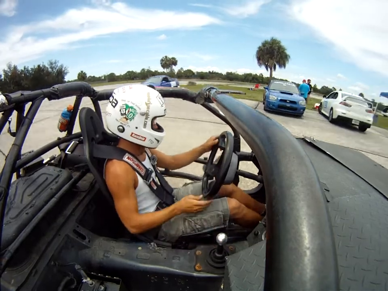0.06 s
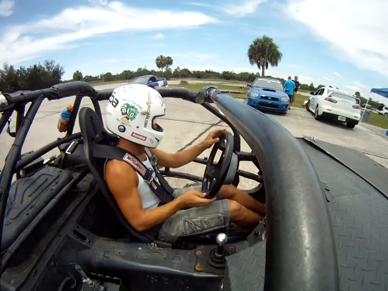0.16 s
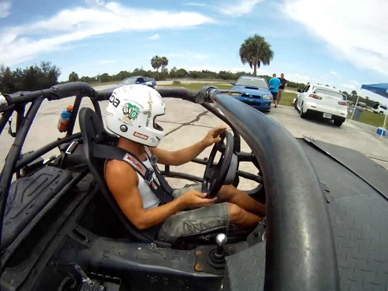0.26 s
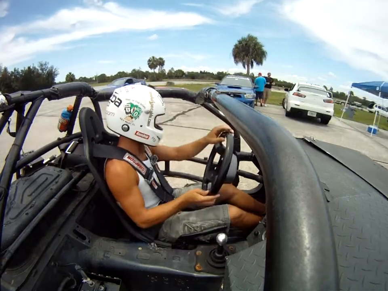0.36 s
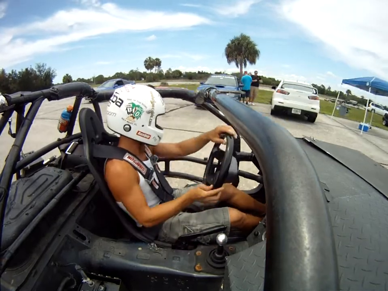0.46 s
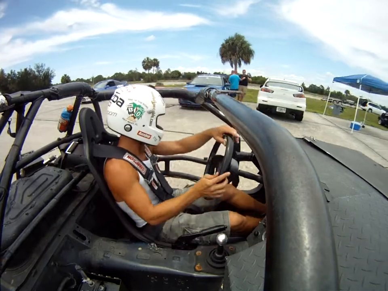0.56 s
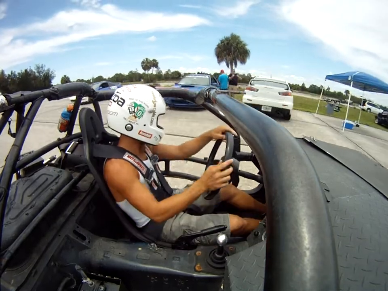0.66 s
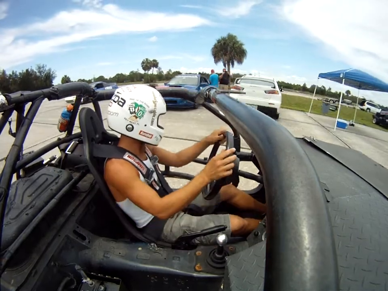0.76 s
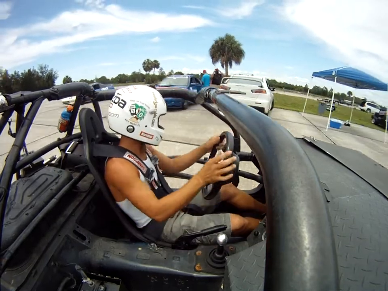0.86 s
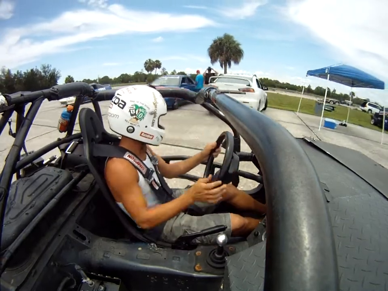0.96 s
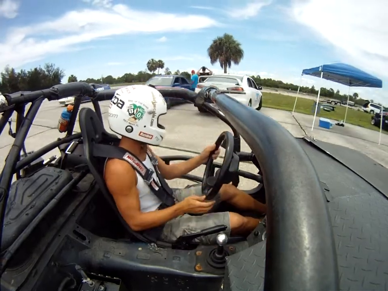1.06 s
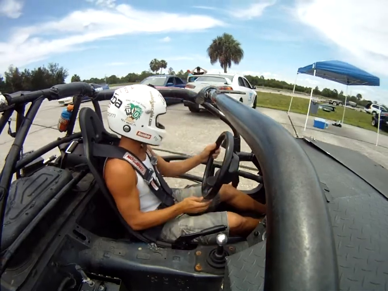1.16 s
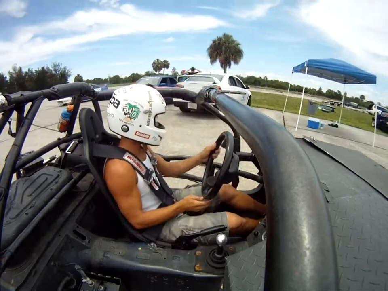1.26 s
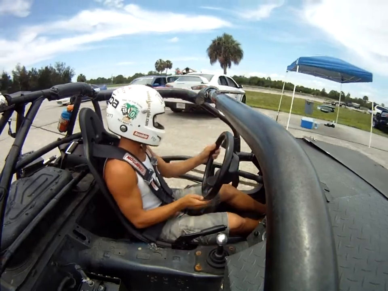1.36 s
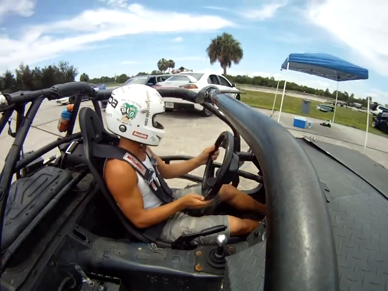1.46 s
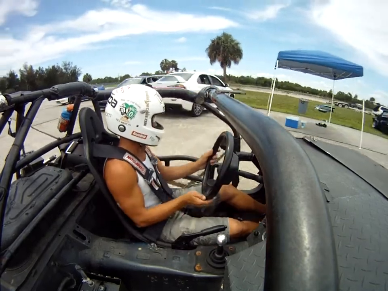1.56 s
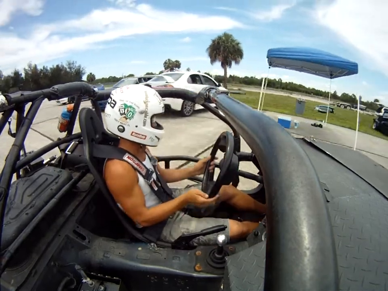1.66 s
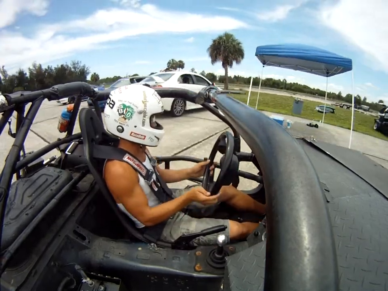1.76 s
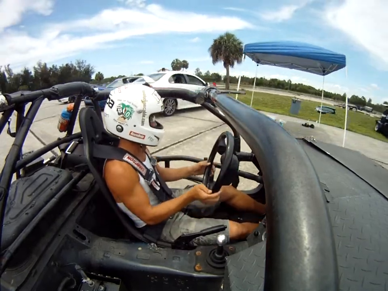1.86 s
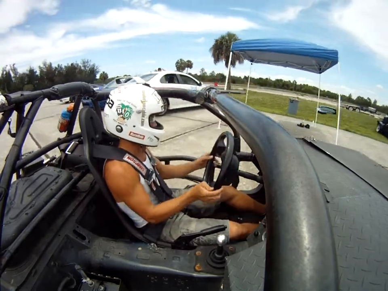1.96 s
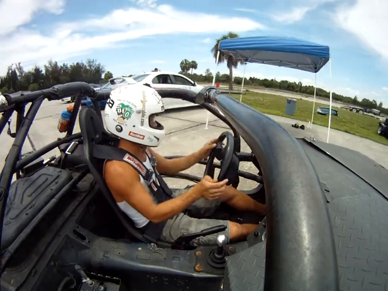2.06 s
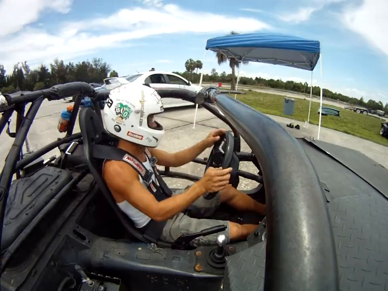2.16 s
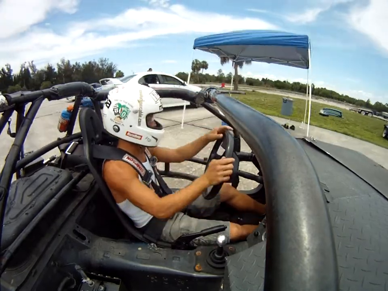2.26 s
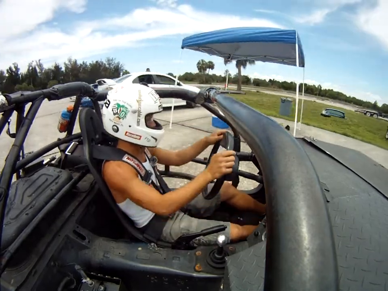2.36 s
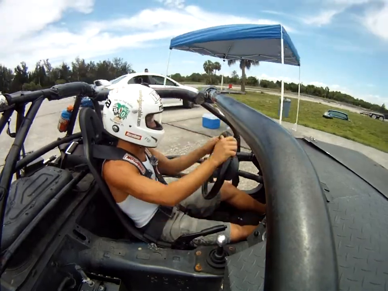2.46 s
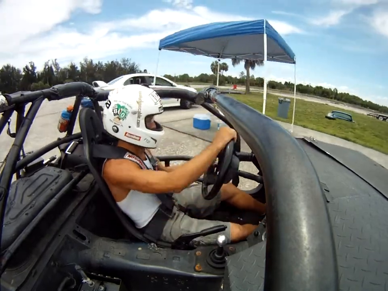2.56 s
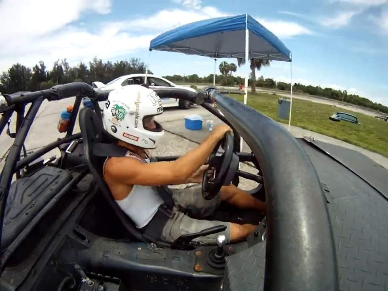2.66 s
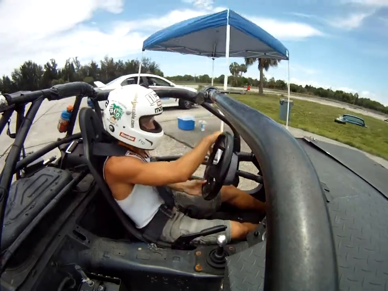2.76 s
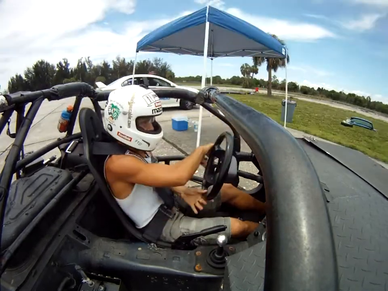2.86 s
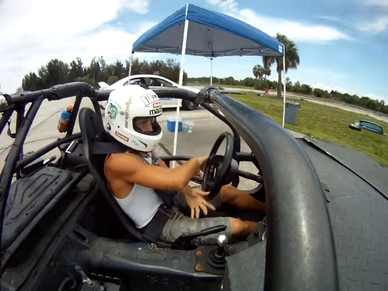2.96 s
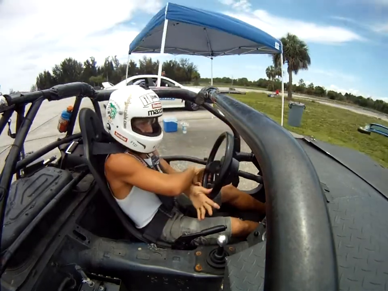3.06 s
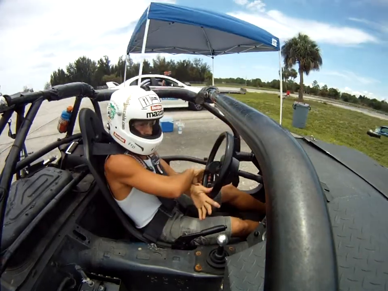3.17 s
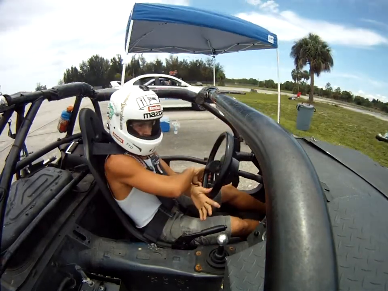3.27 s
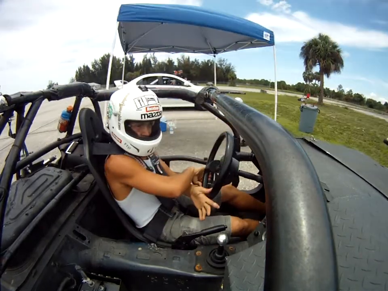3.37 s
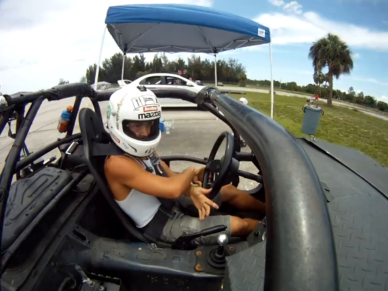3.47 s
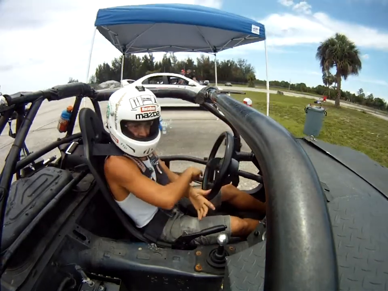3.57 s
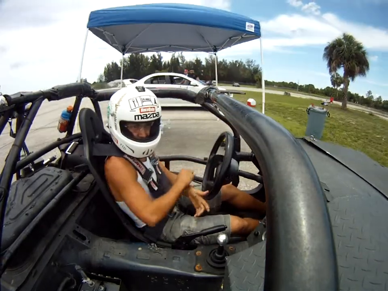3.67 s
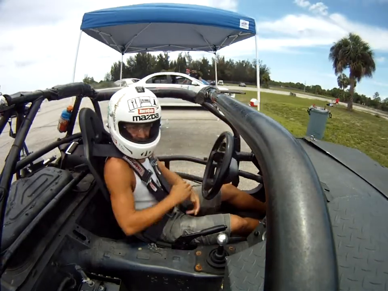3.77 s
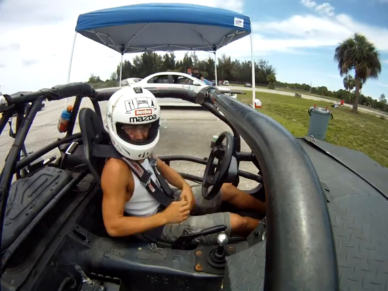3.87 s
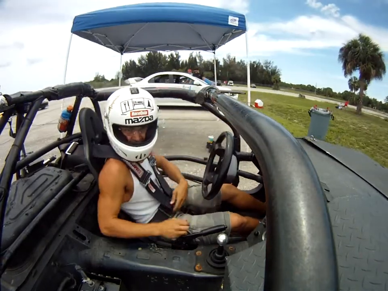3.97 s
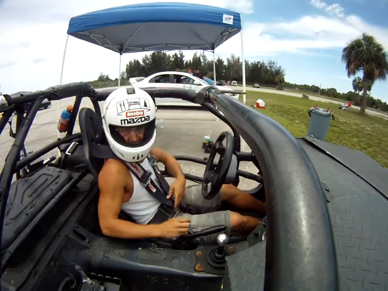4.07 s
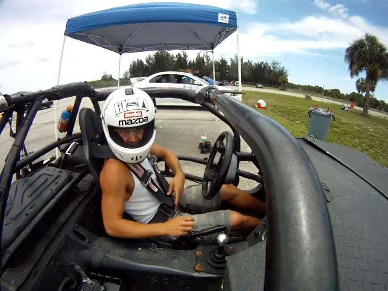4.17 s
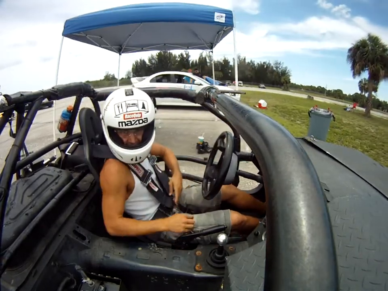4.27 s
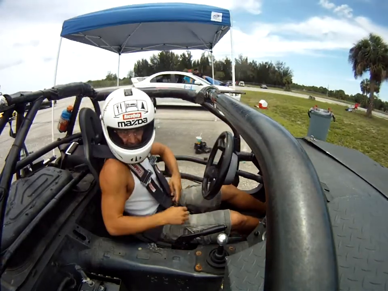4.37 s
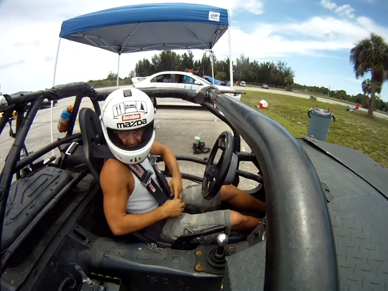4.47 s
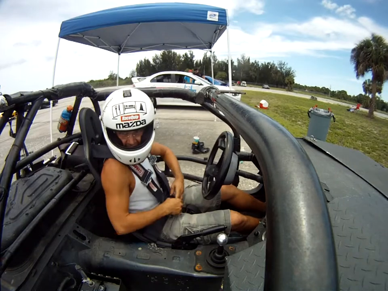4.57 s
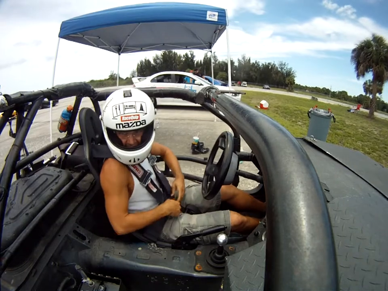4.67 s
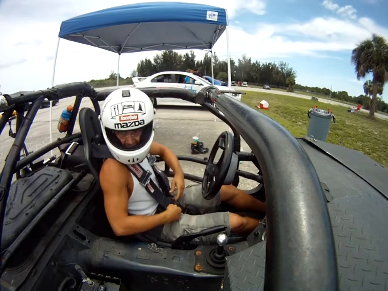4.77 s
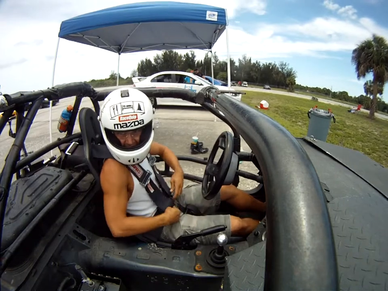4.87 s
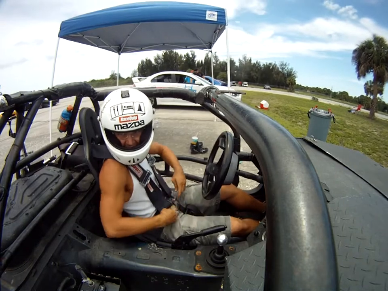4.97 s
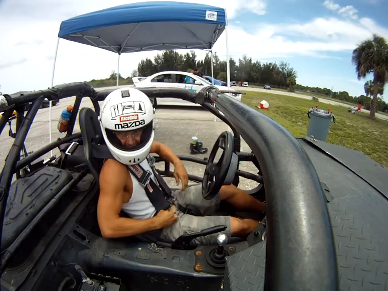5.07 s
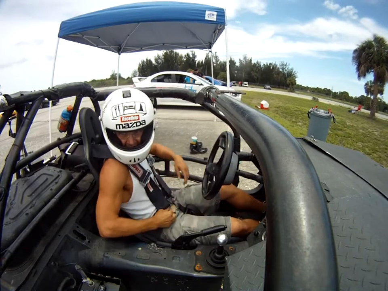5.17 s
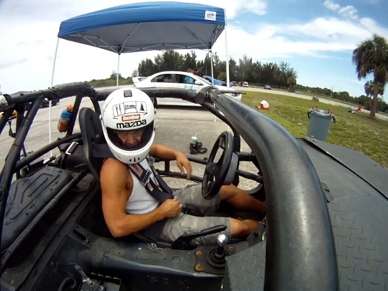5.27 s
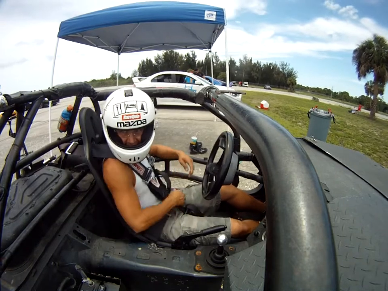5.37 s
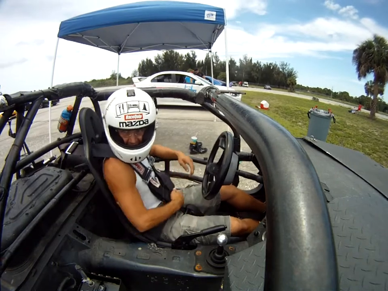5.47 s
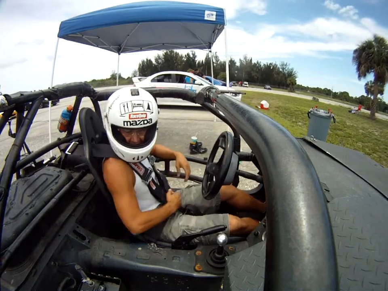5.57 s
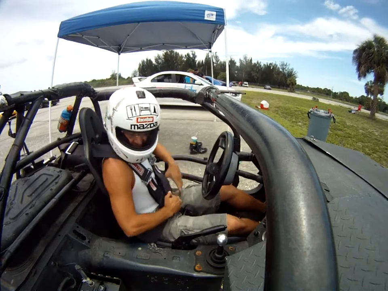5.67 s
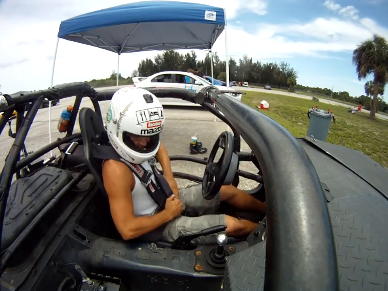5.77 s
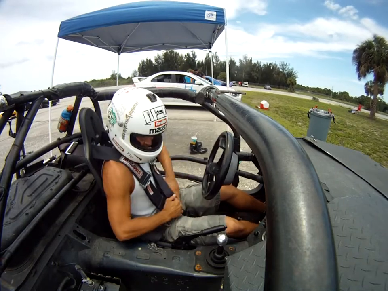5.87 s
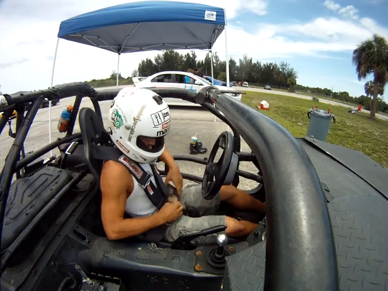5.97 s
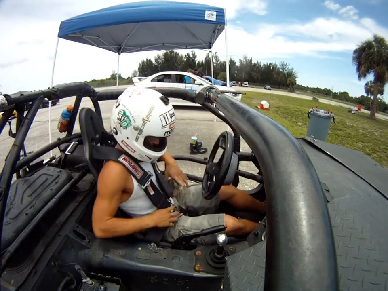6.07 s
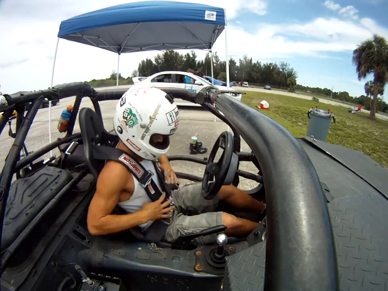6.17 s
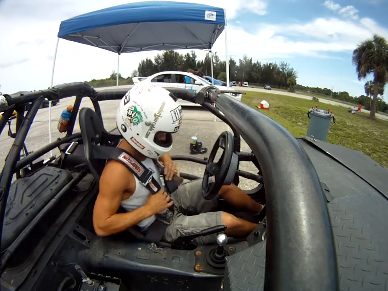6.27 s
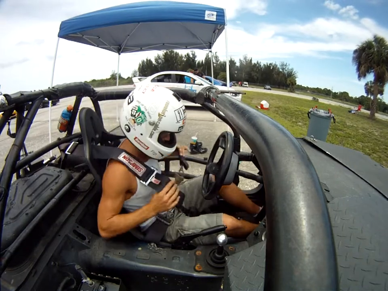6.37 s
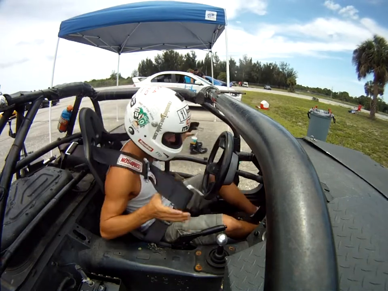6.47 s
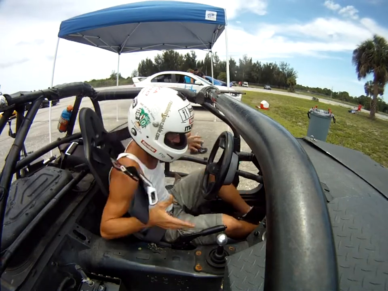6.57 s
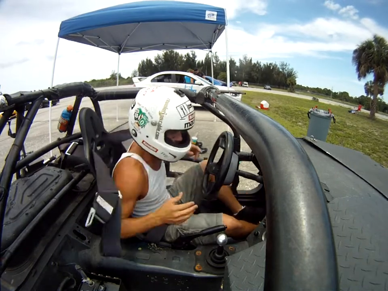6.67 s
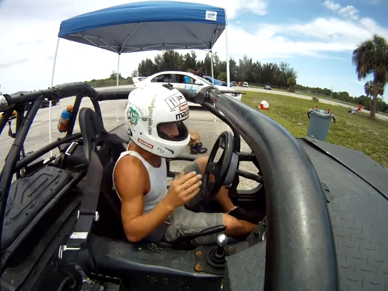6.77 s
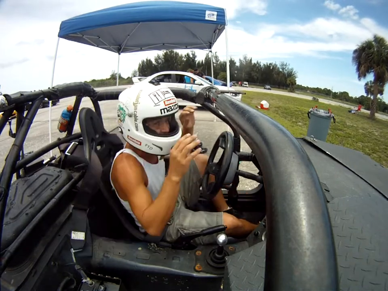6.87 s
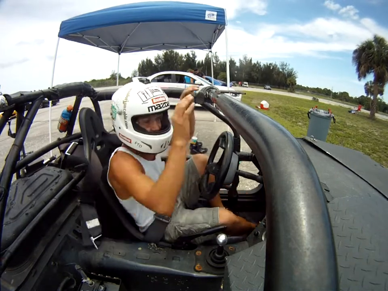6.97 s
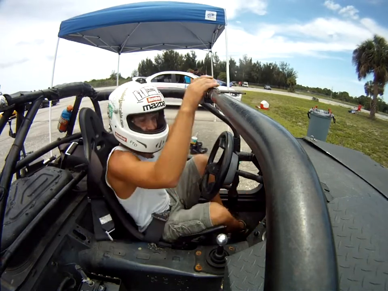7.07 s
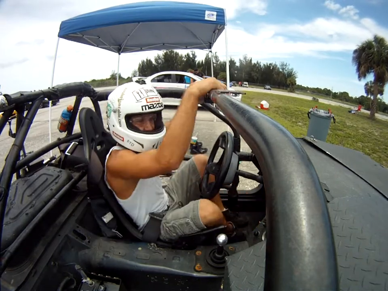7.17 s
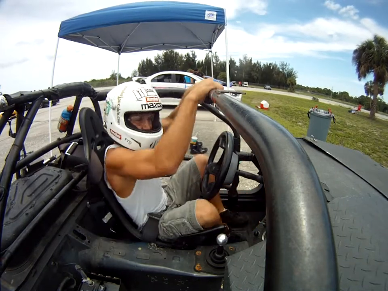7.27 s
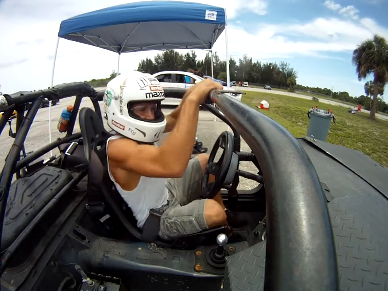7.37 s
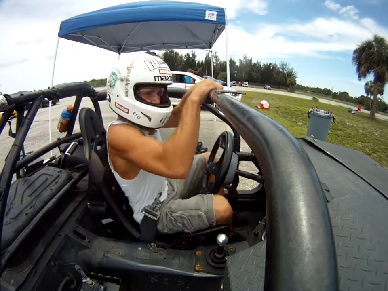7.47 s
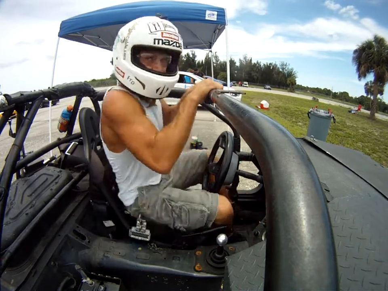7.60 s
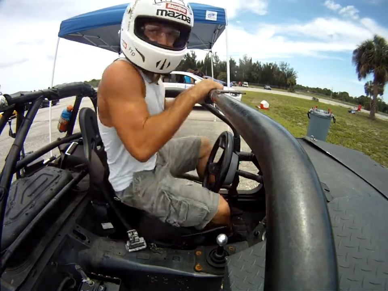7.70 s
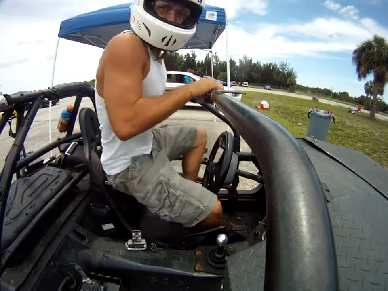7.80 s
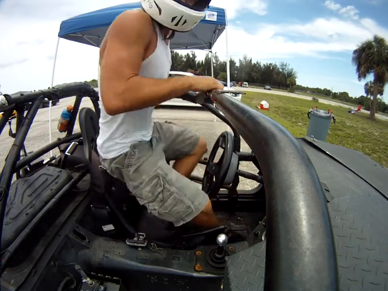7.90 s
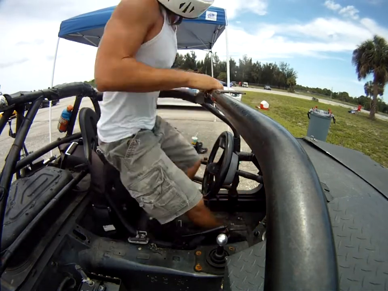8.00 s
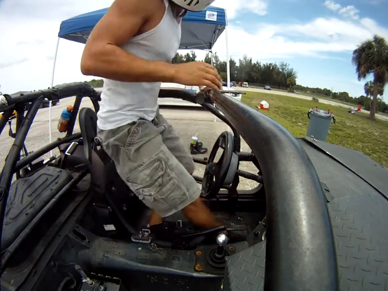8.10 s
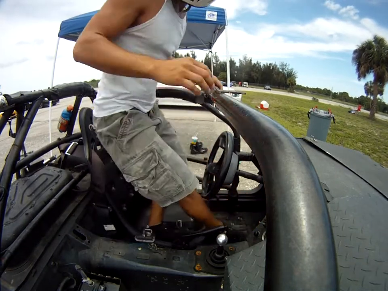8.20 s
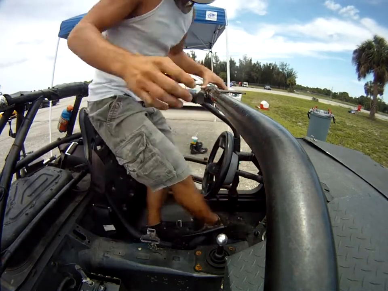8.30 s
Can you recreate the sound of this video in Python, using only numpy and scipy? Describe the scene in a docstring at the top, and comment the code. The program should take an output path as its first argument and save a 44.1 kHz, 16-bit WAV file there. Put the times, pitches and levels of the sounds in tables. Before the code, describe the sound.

A cage-mounted microphone on an open tube-frame car gives close, mid-heavy, slightly crunchy mono sound. From 0 to 2.2 s a low uneven idle throbs over deep chassis rumble, with irregular thin bright ticks and a few faint knocks. At about 2.3 s the engine is blipped, climbing fast to a peak near 2.6 s with rasp and metallic buzz, then gliding down; loose parts chatter until 3.2 s, and another rasp swells around 4.2 s. Loping, thuddy burbles from 4.4 to 4.9 s end in a stop by 5.25 s. Quiet follows, with faint tinks and a small patter of ticks near 5.3 s. At 6.2 s a buckle clacks sharply. A very loud, short smack comes at 6.86 s with a thin brief ring, then bright clanks from 7.0 to 7.4 s, and heavier knocks, thuds and scrabbling on ringing tubes from 7.63 s, thinning out by 8.3 s.

```python
"""On an open tube-frame car rolling to a stop, heard through a small recorder clamped to the roll cage.
The engine is a sum of sines at multiples of its firing rate: it idles, is blipped once and runs down,
its last burbles being thud-heavy transients.
Noise through resonances makes the shaking, rasp and chatter of the cage; thin ticks go on.
The driver then drops the harness buckles and climbs out: short blows and scrabbling noise ring the
cage tubes. A few decaying or steady sines are small metal parts."""
import sys
import numpy as np
from scipy import signal
from scipy.io import wavfile

SR = 44100
rng = np.random.default_rng(int(sys.argv[2]) if len(sys.argv) > 2 else 0)


def transcribe(signal):
    """Save signal, clipped to [-1, 1], as a 16-bit WAV file at the path in sys.argv[1]."""
    frames = np.atleast_2d(signal).T
    limited = np.clip(frames, -1, 1)
    pcm = np.round(limited * 32767).astype(np.int16)
    wavfile.write(sys.argv[1], SR, pcm)


N = 367794
RISE_S = 0.001   # onset of every short sound

# the blip and run-down of the engine: time_s, firing_hz, first_order_db, other_orders_db
RUN_DOWN = [(2.25, 77.9, -18, -29.5), (2.39, 95.86, -32, -35), (2.51, 136.1, -15, -30),
            (2.6, 158.7, -17, -36.5), (2.72, 154.6, -17, -26.5), (2.88, 147, -14.5, -53),
            (2.97, 137.7, -17.5, -40), (3.21, 125.3, -19.5, -40), (3.3, 118.9, -23, -41),
            (3.4, 112.4, -37.5, -33), (3.59, 100.9, -36.5, -34.5), (3.89, 87.1, -25, -41.5),
            (4.01, 83.7, -23, -48), (4.17, 77.53, -19.5, -40), (4.27, 75.9, -31, -36.5),
            (4.47, 65.2, -46, -39.5), (4.72, 50.8, -26.5, -50), (4.9, 43.4, -18, -45),
            (5.06, 37.5, -25, -41), (5.25, 30.8, -35, -46)]
# resonances of the cage tubes, the bright ones from the 14th on: centre_hz, width_hz, level_db
CAGE_MODES = [(702.5, 88, -3.5), (955, 79, -2.5), (1058, 62, -0.5), (1141.6, 46, 1.5), (1229, 59, -0.5),
              (1428, 54, -7), (1523, 33, 0), (1619, 117, -3.5), (1821, 124, -4.5), (1985, 64, -3.5),
              (2114, 116, -4), (2500, 340, -10), (2666, 275, -11), (3070, 190, -20), (3710, 274, -17.5),
              (4060, 210, -64), (5200, 1000, -27), (4970, 4300, -35)]


def amp(db):
    """Level to amplitude: 20 dB is a factor of ten."""
    return 10 ** (np.asarray(db) / 20)


def rms_one(x):
    """Normalisation to unit root-mean-square."""
    return x / np.sqrt(np.mean(x ** 2) + 1e-20)


def in_time(rows):
    """Linear interpolation of a curve's columns, sample by sample."""
    s, *columns = np.transpose(rows)
    return [np.interp(np.arange(N) / SR, s, column) for column in columns]


def during(rows, fade=0.04):
    """Gate that is open while a curve lasts, with linear fades (s)."""
    t = np.arange(N) / SR
    return np.clip(np.minimum(t - rows[0][0], rows[-1][0] - t) / fade, 0, 1)


def drift(rate):
    """Random fluctuation of unit rms: noise through a double-pole low-pass of the given rate (Hz)."""
    step = 40   # samples between computed points
    r = np.exp(-2 * np.pi * step * rate / SR)
    noise = rng.standard_normal(N // step + 2002)
    slow = signal.lfilter([1], [1, -2 * r, r * r], noise)[2000:]   # without the filter's start
    return np.interp(np.arange(N) / step, np.arange(len(slow)), rms_one(slow))


def resonance(x, hz, width):
    """Damped resonator: a pole pair of the given bandwidth (Hz), near unit gain at its centre."""
    r = np.exp(-np.pi * abs(width) / SR)
    zeros = np.array([1, 0, -1]) * (1 - r * r) / 2
    return signal.lfilter(zeros, [1, -2 * r * np.cos(2 * np.pi * hz / SR), r * r], x)


def body(x, modes, twice=False):
    """Modal superposition: resonances in parallel, signs alternating."""
    out = 0
    for k, (hz, width, level_db) in enumerate(modes):
        rung = resonance(x, hz, width)
        if twice:                       # steeper skirts, darker valleys
            rung = resonance(rung, hz, width * 2)
        out = out + (-1) ** k * amp(level_db) * rung
    return out


def pulses(rate, jitter, spread_db, burst_s):
    """Pulse train at a wavering rate (Hz), each pulse a decaying noise burst of its own size."""
    turns = np.cumsum(rate * (1 + jitter * drift(25))) / SR
    starts = np.diff(np.floor(turns), prepend=0) > 0
    marks = starts * amp(spread_db * rng.standard_normal(N))
    r = np.exp(-1 / (burst_s * SR))
    return signal.lfilter([1], [1, -r], marks + 1e-18) * rng.standard_normal(N)


def bursts(rows):
    """Transient noise under a Gaussian decay; rows of time_s, level_db, length_s (RISE_S is added)."""
    out, t = np.zeros(N), np.arange(SR // 20) / SR
    noise = rng.standard_normal((len(rows), len(t)))
    for (s, level_db, length), hiss in zip(rows, noise):
        envelope = np.minimum(t / RISE_S, 1) * np.exp(-(t / (abs(length) + RISE_S)) ** 2)
        i = round(s * SR)
        out[i:i + len(t)] += amp(level_db) * envelope * hiss
    return out


def engine():
    """Harmonic synthesis: orders of the firing rate, a little unsteady in level."""
    # multiples of the firing rate, and their levels in dB before the colour
    other_orders = [.5, 1.5, 2.5, 3, 3.5, 4, 5]
    other_orders_db = [0, 1, -9, -3, -11, -2.5, -8.5]
    # colour of the other orders along pitch: pitch_hz, level_db
    colour = np.array([(15, -14), (70, 3.5), (160, -6), (200, -14), (260, -13), (330, -6), (440, -3),
                       (520, -41.5), (900, 8)])
    hz, first_db, other_db = in_time(RUN_DOWN)
    phase = 2 * np.pi * np.cumsum(hz) / SR
    # below 53.4 Hz the dying engine lopes, fully from 7.4 Hz lower; it lurches at 4.81 s, period 0.124 s
    lope = np.cos(2 * np.pi * (np.arange(N) / SR - 4.81) / 0.124) - 1
    lope_db = 6 * lope * np.clip((53.4 - hz) / 7.4, 0, 1)
    out = amp(first_db + 1.15 * drift(11) + lope_db) * np.sin(phase)
    # the second order stands out only while it passes the body's boom
    boom_hz, boom_width_hz, over_first_db = 158.6, 11.7, 4.5
    second = amp(over_first_db + first_db) / (1 + ((2 * hz - boom_hz) / boom_width_hz) ** 2) ** 2
    out += second * amp(0.5 * drift(36)) * np.sin(2 * phase)
    for order, order_db in zip(other_orders, other_orders_db):
        colour_db = np.interp(np.log(order * hz), np.log(colour[:, 0]), colour[:, 1])
        level = amp(other_db + order_db + colour_db + 3.8 * drift(11))
        out += level * np.sin(order * phase + rng.uniform(0, 2 * np.pi))
    return np.sqrt(2) * during(RUN_DOWN) * out


def idle():
    """Harmonic synthesis: orders of the idling engine swell and fade as firings come unevenly."""
    # idling: time_s, firing_hz, level_db
    idling = [(0.0, 34.2, -18.5), (0.3, 31.34, -25), (0.55, 30.59, -23), (0.82, 32.88, -21.5),
              (1.2, 31.83, -25.5), (1.45, 33.63, -27), (1.7, 32.23, -23.5), (2.3, 32.73, -23.5)]
    # multiples of the firing rate, and their levels in dB
    idle_orders = [1, 1.5, 2, 3, 4, 5, 10]
    idle_orders_db = [-2.5, -6.5, -5.5, -9, -13, -8.5, -26]
    hz, level_db = in_time(idling)
    phase = 2 * np.pi * np.cumsum(hz * (1 + 0.01436 * drift(5.55))) / SR
    orders = sum(amp(order_db + 3.3 * drift(12.3)) * np.sin(order * phase + rng.uniform(0, 2 * np.pi))
                 for order, order_db in zip(idle_orders, idle_orders_db))
    fade_out = np.clip((idling[-1][0] - np.arange(N) / SR) / 0.13, 0, 1)
    return amp(level_db) * fade_out * orders


def shaking():
    """Forced vibration: uneven running and rough ground drive chassis, panels and cage as noise."""
    # shaking of the car: time_s, rumble_db, boom_db, cage_buzz_db
    shake = [(0.0, -19, -37, -39.5), (0.3, -18.5, -35.5, -43.5), (0.65, -17.5, -30, -42),
             (0.9, -24, -29.5, -46), (1.51, -25.5, -37.5, -47.5), (2.04, -25.5, -38.5, -47.5),
             (2.32, -22.5, -24, -40), (2.6, -27, -30, -31.5), (2.85, -19.5, -26, -36),
             (3.09, -25, -27, -33), (3.28, -21, -28.5, -37), (3.44, -20.5, -36.5, -38.5),
             (3.95, -29.5, -38, -44), (4.16, -31, -31, -32.5), (4.3, -22, -33, -43),
             (4.64, -39, -40, -48.5), (4.95, -36, -45.5, -50.5), (5.09, -32.5, -43.5, -51),
             (5.62, -33, -47, -52), (6.6, -33.5, -44.5, -52.5), (7.1, -34.5, -45.5, -47),
             (7.5, -35, -46, -46), (8.34, -32.5, -43, -47)]
    # resonances of chassis, boom and panels: centre_hz, width_hz, level_db
    rumble_modes = [(32.6, 24.1, 3.5), (60, 17.6, 4), (92.2, 19.7, -9.5)]
    boom_modes = [(138, 14, -2), (157.9, 11.8, 3.5)]
    panel_modes = [(230, 81, -5), (307.5, 28.4, 5.5), (372, 55, -0.5), (437, 62, -8)]
    rumble_db, boom_db, buzz_db = in_time(shake)
    # the panels lie at -55 dB at a calm buzz of -50.5 dB and follow nearly all of its swing
    panel_db = -55 + 0.99 * (buzz_db + 50.5)
    white = rng.standard_normal((4, N))
    grit = white[3] * amp(0.97 * drift(33.0) + 2.3 * drift(165))      # the buzz comes in small lumps
    rumble = amp(rumble_db) * rms_one(body(white[0], rumble_modes, twice=True))
    boom = amp(boom_db) * rms_one(body(white[1], boom_modes, twice=True))
    panels = amp(panel_db + 3.64 * drift(89)) * rms_one(body(white[2], panel_modes, twice=True))
    buzz = amp(buzz_db) * rms_one(body(grit, CAGE_MODES))
    return rumble + boom + panels + buzz


def rasp():
    """Amplitude-gated noise: contact at each firing, lumpy, rings the tubes nearest the engine."""
    # swells, rise and fall being times per 20 dB: loudest_s, level_db, rise_s, fall_s
    rasp_swells = [(2.54, -15.5, 0.051, 0.062), (2.66, -31, .1, .15), (3.0, -29, 0.17, 0.11),
                   (3.171, -16, 0.25, 0.043), (3.6, -39.5, 0.99, 0.033), (3.9, -49, 0.023, 0.56),
                   (4.05, -26.5, .15, 0.27), (4.21, -19, 0.31, 0.063), (4.46, -35.5, 0.38, .04)]
    # tubes nearest the engine: centre_hz, width_hz, level_db
    tube_modes = [(756, 40.5, 4), (993, 65, 1), (1159, 27.5, 5), (1238, 80, -3), (1420, 67, 2),
                  (1501, 30, 3), (1595, 31, 4.5), (2124, 42, -8), (3700, 230, -26.5), (4700, 460, -50.5),
                  (4830, 370, -50)]
    gated = pulses(in_time(RUN_DOWN)[0], jitter=0.03, spread_db=1.5, burst_s=0.0036)
    t = np.arange(N) / SR
    swells = sum(amp(level_db - 20 * np.maximum((s - t) / rise, (t - s) / fall))
                 for s, level_db, rise, fall in rasp_swells)
    return amp(1.18 * drift(30.5) - 9.0) * swells * rms_one(body(gated, tube_modes, twice=True))


def chatter():
    """Repeated impact, a tap every second firing: a loose part rings; runs swell and fade."""
    # runs of taps, level before the part's gain: first_s, loudest_s, end_s, level_db
    runs = [(2.546, 2.556, 2.57, -31), (2.603, 2.604, 2.61, -39), (2.7744, 2.78, 2.83, -38.5),
            (2.905, 2.904, 3, -38), (3.044, 3.05, 3.08, -35), (3.0904, 3.16, 3.21, -26)]
    # resonances of the loose part: centre_hz, width_hz, level_db
    loose_part = [(3745, 186, 1.5), (5350, 380, -1.5), (2140, 440, 3)]
    swell_db_per_s, fade_db_per_s, tap_s = 70, 243, 0.0085
    taps = []
    for first, loudest, last, level_db in runs:
        gap = 2 / np.interp(loudest, *np.transpose(RUN_DOWN)[:2])
        for s in np.arange(first, last, gap):
            below_db = max(swell_db_per_s * (loudest - s), fade_db_per_s * (s - loudest))
            taps.append((s, level_db - below_db, tap_s))
    return amp(17.0) * body(bursts(taps), loose_part, twice=True)


def knocks_and_burbles():
    """Transient excitation: a contact, then noise dying away in cage and floor, and a bright crack."""
    # knocks on the cage; the four thud-heavy rows from 4.439 to 4.899 s are burbles of the dying engine;
    # thud and crack relative to the level: time_s, level_db, thud_db, crack_db, centre_hz, t60_s
    events = [(0.028, -28, -18, -29, 1160, 0.087), (0.532, -32, -20, -29, 1150, .08),
              (0.558, -31.5, -20, -27, 1550, .07), (0.926, -31.5, -18, -32, 1390, .1),
              (1.448, -35, -20, -32, 1449, 0.12), (4.439, -42.5, 13.5, -25, 900, .12),
              (4.601, -44.5, 12, -25, 900, 0.12), (4.675, -37.5, 6.5, -25, 1155, 0.13),
              (4.899, -49.5, 14, -25, 893, 0.085), (6.166, -22, 6.5, -32, 1150, 0.089),
              (6.203, -5.5, -17.5, -18, 1370, 0.17), (6.207, -18.5, -30, -14, 2580, 0.098),
              (6.251, -17.5, -8.5, -15, 1340, .17), (6.253, -24, -30, -15, 2500, 0.18),
              (6.276, -30, -4, -15, 1196, 0.33), (6.833, -36.5, -8, -8, 2090, 0.16),
              (6.851, -12.5, -30, -21, 1690, 0.075), (6.859, 4, -35, -17, 1650, 0.019),
              (6.868, -14.5, -13, -17, 1100, 0.11), (6.883, -19, -14, -35, 1200, 0.21),
              (7.015, -9, -27, -9.5, 2050, 0.12), (7.071, -24, -24, -25, 1340, 0.14),
              (7.217, -28, -17, -13, 1160, 0.081), (7.244, -24, -21, -10, 1120, 0.057),
              (7.31, -11.5, -23, -13.5, 1350, 0.13), (7.342, -16, -19, -16, 1440, 0.084),
              (7.402, -8, -31, -25, 1700, 0.13), (7.634, -22.5, -8, -35, 1150, 0.067),
              (7.652, -11.5, 2, -19, 1180, 0.12), (7.666, -20.5, -8, -0.5, 1400, 0.1),
              (7.709, -11.5, -8.5, -11, 1490, 0.12), (7.745, -14, -2.5, -10, 1550, 0.16),
              (7.79, -21, -14, -30, 1290, 0.052), (7.941, -13.5, -10, -22, 1220, 0.072),
              (7.964, -32, 10.5, -32, 1120, 0.19), (8.048, -11, -13.5, -17.5, 1450, 0.16),
              (8.074, -21, -9, -17, 1270, 0.14), (8.159, -22, -7, -24, 1300, 0.065),
              (8.224, -27, -5, -29, 1240, 0.071), (8.27, -30.5, -14, -31, 1270, 0.2)]
    # resonances of floor and seat: centre_hz, width_hz, level_db
    floor_modes = [(131.6, 48, 5.5), (312, 67, 0.5), (381, 63, 1), (682, 110, -8.5)]
    tubes, bright = CAGE_MODES[:13], CAGE_MODES[13:]
    out, t = np.zeros(N), np.arange(SR // 3) / SR
    noise = rng.standard_normal((len(events), 4, len(t)))
    luck = rng.standard_normal((len(events), len(CAGE_MODES)))
    rise, impulse = np.minimum(t / RISE_S, 1), t == 0
    for (s, level_db, thud_db, crack_db, hiss_hz, t60), hiss, odd in zip(events, noise, luck):
        after = np.maximum(t - 0.067 * t60, 0)   # the contact lasts a share of t60
        push = rise * amp(-60 * after / (abs(t60) + RISE_S))
        touch = rise * amp(-60 * after / (0.33 * t60))
        contact = body(touch * hiss[0], [(hiss_hz, 450., 0)], twice=True)
        # excited tubes ring narrower, short events wider; modes near the centre pitch answer most
        excited = [(f, 0.39 * width + 2.47 / t60, mode_db - 8.2 * np.log2(f / hiss_hz) ** 2 + 3.5 * o)
                   for (f, width, mode_db), o in zip(tubes, odd)]
        # the scrabble is grainy: two noises multiplied
        ring = body(push * hiss[1] * hiss[0] + amp(20) * impulse, excited, twice=True)
        thud = body(push ** 0.71 * hiss[2] + amp(24) * impulse, floor_modes, twice=True)
        crack = body(push ** 1.55 * hiss[3], bright, twice=True)
        parts = ((-5.0, contact), (-1.5, ring), (thud_db, thud), (crack_db, crack))
        event = sum(amp(part_db) * part / np.abs(part).max() for part_db, part in parts)
        i = round(s * SR)
        out[i:i + len(t)] += amp(level_db) * event[:N - i]
    return out


def pings():
    """Pure tones: thin steady rings with linear fades."""
    # start_s, length_s, pitch_hz, level_db
    rings = [(6.9, 0.13, 1927, -38.5), (3.6, 0.39, 1545, -53)]
    t, fade_s = np.arange(N) / SR, 0.015
    return sum(amp(level_db) * np.clip(np.minimum(t - s, s + length - t) / fade_s, 0, 1)
               * np.sin(2 * np.pi * hz * t) for s, length, hz, level_db in rings)


def tinks():
    """Free decay: small metal parts touch and ring for an instant as exponentially dying sines."""
    # RISE_S is added to the decay: time_s, pitch_hz, level_db, t60_s
    touches = [(5.225, 3280, -40, 0.041), (5.226, 5200, -46, 0.048), (5.572, 5200, -48, 0.044),
               (5.68, 2570, -43.5, 0.082), (6.42, 5170, -46, .05), (6.425, 2180, -44, .08)]
    t, out = np.arange(N) / SR, 0
    for s, hz, level_db, t60 in touches:
        decay_db = -60 * np.maximum(t - s, 0) / (abs(t60) + RISE_S)
        out = out + amp(level_db + decay_db) * np.clip((t - s) / RISE_S, 0, 1) * np.sin(2 * np.pi * hz * t)
    return out


def ticking():
    """Band-limited transients: thin bright ticks, a few standing out of many weak ones."""
    # waves of the weak ticks, before a common gain: time_s, level_db
    waves = [(0.0, -59), (0.39, -66), (0.6, -65.5), (0.93, -70), (1.05, -66), (1.3, -60), (1.42, -66),
             (1.67, -60), (2.04, -66.5), (2.39, -56.5), (2.7, -50.5), (3.04, -54.5), (3.21, -64),
             (3.81, -70), (4.08, -57.5), (4.44, -75), (5.15, -75), (5.33, -55), (5.5, -69.5), (5.75, -63.5),
             (6.3, -62.5), (6.8, -67), (7.2, -67.5), (7.46, -73), (7.8, -61), (8.11, -76), (8.34, -75)]
    # the clearest ticks, before a common gain: time_s, level_db
    clear_ticks = [(0.064, -40), (0.1256, -32), (0.187, -39), (0.226, -35), (0.242, -36), (0.2673, -37),
                   (0.283, -44), (0.309, -36.5), (0.323, -37), (0.351, -40), (0.367, -39), (0.448, -40),
                   (0.5635, -40), (0.7724, -41), (0.988, -39), (1.0154, -39.5), (1.049, -38), (1.061, -39),
                   (1.089, -34.5), (1.107, -37), (1.1304, -36.5), (1.147, -40), (1.1633, -38), (1.181, -40),
                   (1.204, -37.5), (1.236, -39), (1.267, -40), (1.291, -42), (1.3142, -46), (1.3663, -45),
                   (1.488, -40), (1.505, -40), (1.533, -41.5), (1.6683, -53), (1.696, -45), (1.7669, -43),
                   (1.811, -43), (1.866, -37.5), (1.9013, -38), (1.9424, -41), (1.953, -40), (1.976, -36.5),
                   (2.009, -44), (2.0343, -44), (2.2086, -40), (2.2327, -40.5), (2.268, -39.5),
                   (2.3086, -34), (2.423, -37), (2.5087, -33.5), (5.3044, -50), (5.316, -44), (5.3358, -39),
                   (5.353, -43), (5.368, -41.5), (5.789, -45), (6.013, -43), (6.3046, -41), (6.42, -45),
                   (7.1477, -46)]
    # lower and upper edge of the ticks' band in Hz
    band_hz = [3000, 5500]
    weak = rms_one(pulses(49, jitter=0.22, spread_db=3.5, burst_s=0.0092))   # 49 ticks a second
    bed = amp(in_time(waves)[0] + 13.5) * weak
    clear = amp(4.0) * bursts([(s, level_db, 0.0066) for s, level_db in clear_ticks])
    band = signal.butter(3, band_hz, "band", fs=SR, output="sos")
    return signal.sosfilt(band, bed + clear)


def scene():
    """Superposition: everything reaches the one microphone through the cage."""
    car = idle() + engine() + shaking() + rasp() + chatter() + ticking()
    return (car + knocks_and_burbles() + pings() + tinks())[None]


def record(dry):
    """Sample and hold: slow steps mirror the sound around the sampling rate; then the top is cut."""
    hold_hz, overload = 12000, 0.82   # peaks are clipped at the overload
    band = signal.sosfilt(signal.butter(8, 5750, fs=SR, output="sos"), dry)
    slow = np.clip(signal.resample_poly(band, hold_hz, SR, axis=1), -overload, overload)
    steps = np.repeat(slow, 4, axis=1)
    held = signal.resample_poly(steps, SR, 4 * hold_hz, axis=1)[:, :N]
    held = np.pad(held, ((0, 0), (0, N - held.shape[1])))
    top_cut = signal.cheby2(12, 60, 16000, fs=SR, output="sos")   # 60 dB down from 16 kHz
    return signal.sosfilt(top_cut, held)


dry = scene()
out = record(dry)
transcribe(out)
```